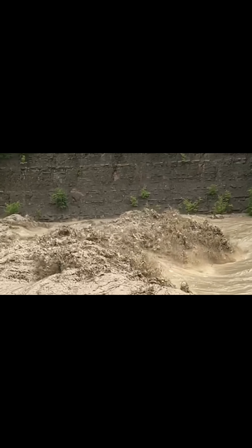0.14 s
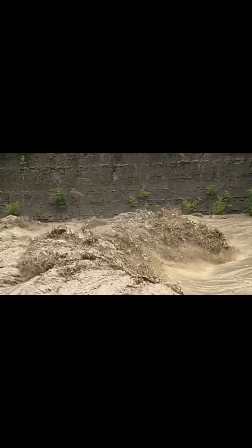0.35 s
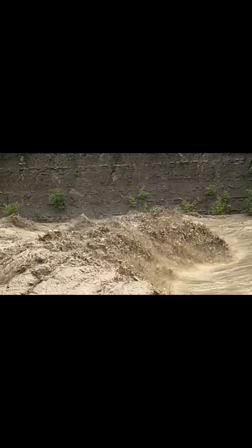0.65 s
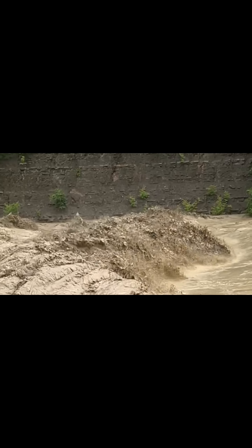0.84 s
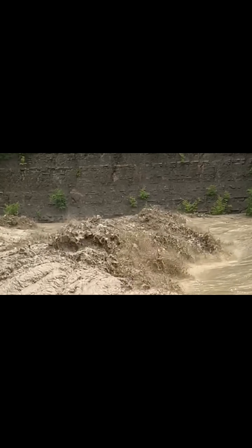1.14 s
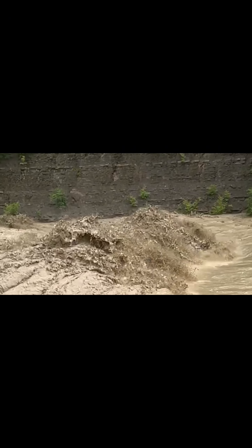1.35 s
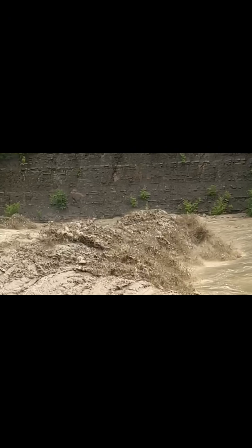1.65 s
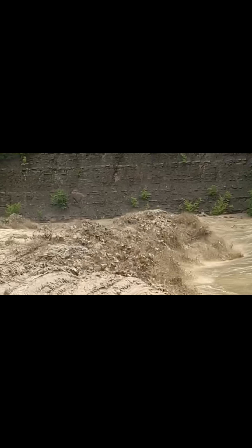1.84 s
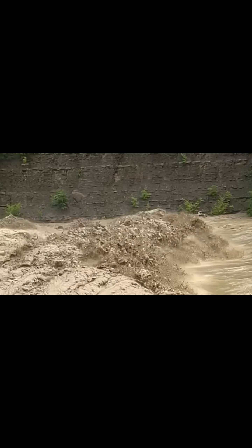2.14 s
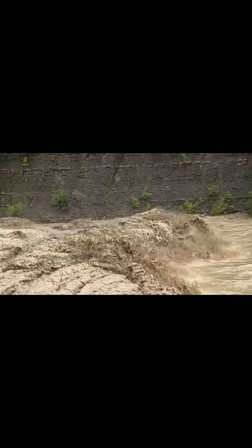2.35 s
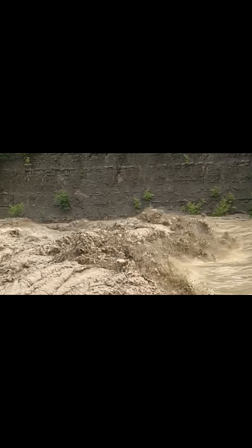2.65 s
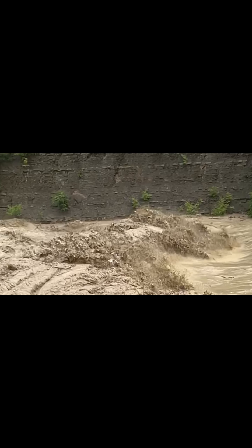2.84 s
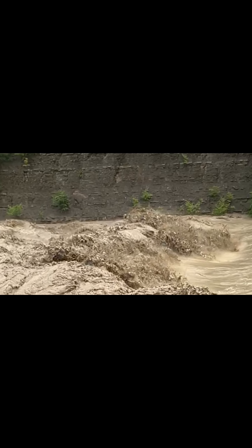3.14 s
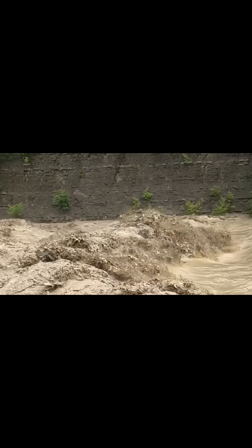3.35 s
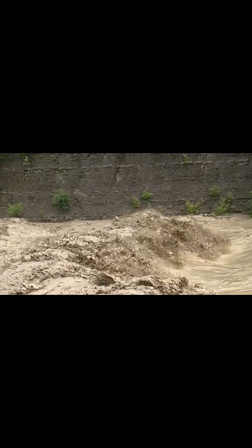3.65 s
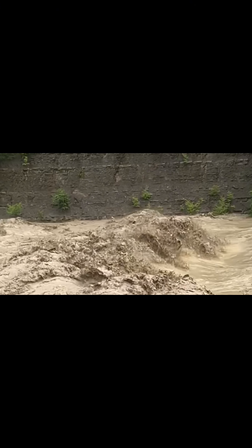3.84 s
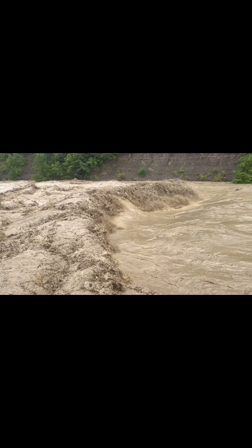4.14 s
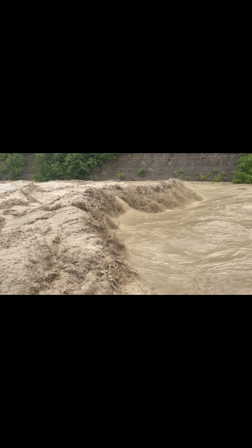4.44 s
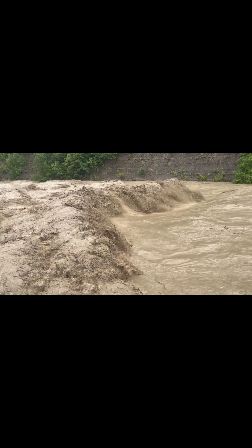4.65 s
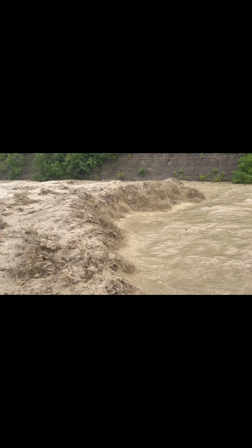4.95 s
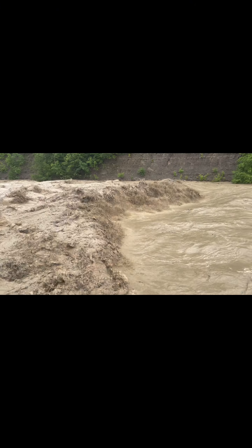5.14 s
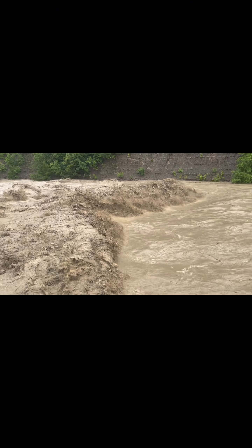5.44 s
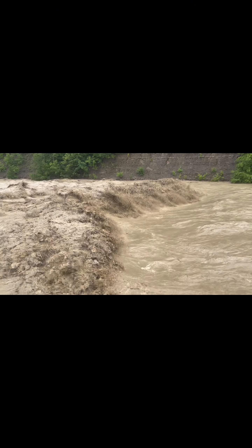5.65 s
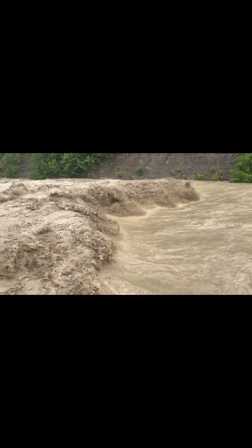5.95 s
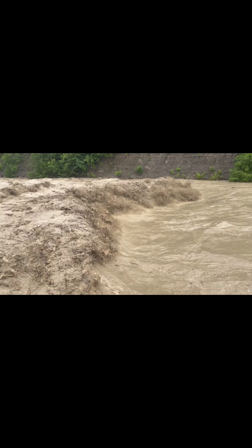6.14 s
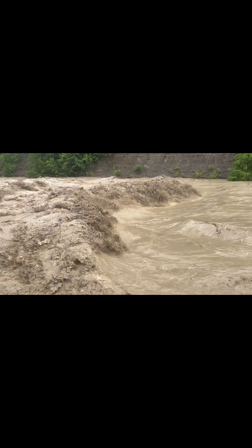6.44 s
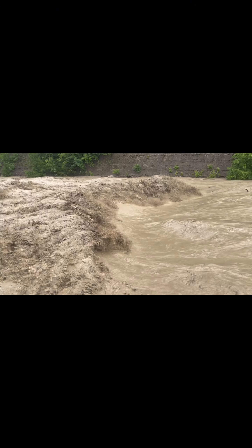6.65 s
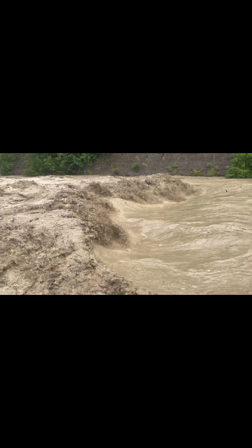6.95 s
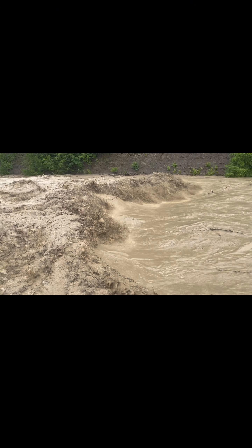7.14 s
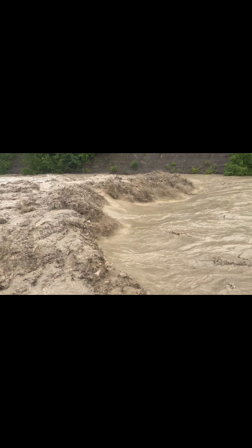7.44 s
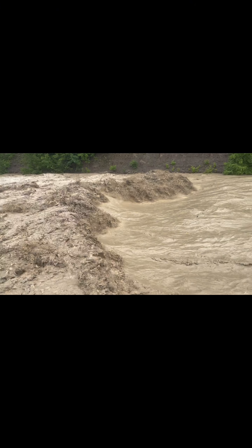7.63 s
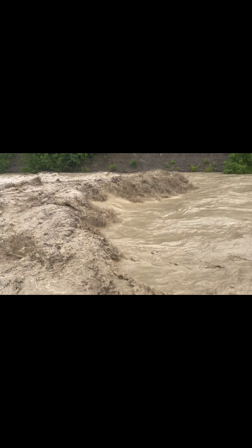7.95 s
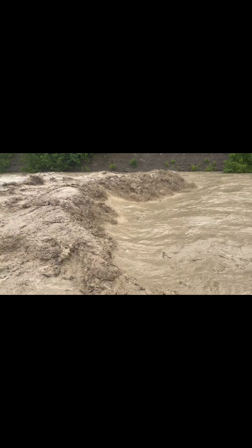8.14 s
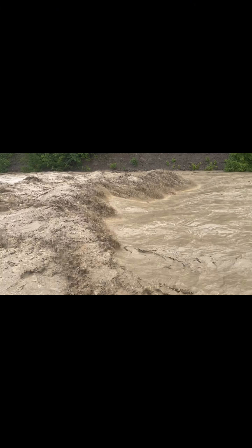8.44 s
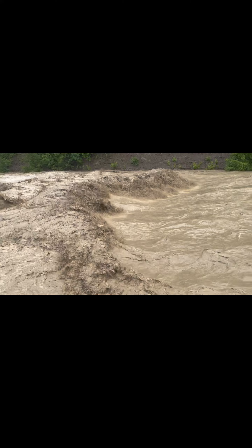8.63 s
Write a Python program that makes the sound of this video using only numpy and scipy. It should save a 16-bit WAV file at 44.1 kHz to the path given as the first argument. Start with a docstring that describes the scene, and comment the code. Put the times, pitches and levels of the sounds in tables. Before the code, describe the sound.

From 0 s, a swollen muddy river roars without pause, close and loud before a cliff wall. The sound is a deep, dull, wide rush with strong rumble, dense froth and small splashes, its highest treble cut off. Breaking waves make soft swells lasting about half a second to a second, and occasional low thumps of trapped air appear from about 1 s, with a stronger one near 3.4 s. The spray gradually brightens a little. At about 4.1 s the place changes abruptly to the open spillway: the level drops, dips briefly and recovers within half a second. The water is now quieter, airier and hissier, still with low rumble beneath. Plunging thuds cluster from 4.6 to 5 s and again around 6.7 to 7.2 s, then become sparse. Surges near 6.8 and 8.1 s pass, and the rush continues to the end around 9 s without fading.

```python
"""A river in flood pours over a bank of mud and debris, heard from two places in turn.
Before a cliff it roars, deep and dull; along the open spillway it hisses. Plunging waves thump.
The rush is patchy noise plus swarms of ringing bubbles; splashes spatter as short narrow-band bursts.
Breaking waves and sloshing move the levels of four bands: rumble, churn, rush, spray.
"""
import sys
import numpy as np
from scipy import signal
from scipy.fft import rfft, irfft
from scipy.io import wavfile
from scipy.ndimage import uniform_filter1d

SR = 44100
rng = np.random.default_rng(int(sys.argv[2]) if len(sys.argv) > 2 else 0)


def transcribe(signal):
    """Save signal, clipped to [-1, 1], as a 16-bit WAV file at the path in sys.argv[1]."""
    frames = np.atleast_2d(signal).T
    limited = np.clip(frames, -1, 1)
    pcm = np.round(limited * 32767).astype(np.int16)
    wavfile.write(sys.argv[1], SR, pcm)


N = 387638
T_S = np.arange(N) / SR
F_HZ = np.fft.rfftfreq(N, 1 / SR)


def gain_of(db):
    """Converts decibels to an amplitude factor."""
    return 10 ** (np.asarray(db) / 20)


def evened(x):
    """Scales to rms 1, over all channels together."""
    return x / np.sqrt(np.mean(x ** 2) + 1e-20)


def add(mix, start_s, sound):
    """Adds a sound into the mix in place, cut at the end."""
    part = mix[max(round(start_s * SR), 0):][:len(sound)]
    part += sound[:len(part)]


def low_pass(x, edge_hz):
    """Steep linear-phase band limit on both channels."""
    taps = signal.firwin(511, edge_hz, window=("kaiser", 9), fs=SR)
    return signal.oaconvolve(x, taps[None], "same")


def turbulence(patchy_db, flicker_db, smooth_hz):
    """Two independent noise streams with shared flare-ups, patchy in time and pitch."""
    hz, _, z = signal.stft(rng.standard_normal((2, N)), SR, nperseg=512, noverlap=384)
    patches = uniform_filter1d(rng.standard_normal(z.shape[1:]), size=10, axis=0)
    patches = evened(uniform_filter1d(patches, size=16, axis=1))
    flicker = evened(uniform_filter1d(rng.standard_normal(z.shape[2]), size=8))
    # fine spray has so many drops that it evens out
    lumpy = 1 / np.hypot(1, hz / smooth_hz)
    z *= gain_of(lumpy[:, None] * (patchy_db * patches + flicker_db * flicker))
    _, noise = signal.istft(z, SR, nperseg=512, noverlap=384)
    return evened(noise[:, :N])


def bubbles(per_s, spread_db, cycles, glide, count=48):
    """Bubbles of many sizes ring briefly, rising in pitch as they near the surface; per_s is per size."""
    out = np.zeros(N)
    for hz in np.geomspace(300, 12000, count):
        age = np.arange(0, 2, hz / (cycles * SR))  # unit: the time of `cycles` periods
        ring = np.exp(-np.pi * age) * np.sin(2 * np.pi * cycles * age * (1 + glide * age))
        chance = rng.random(N)
        size = np.minimum(rng.exponential(1, N), 4)
        births = (chance < per_s / SR) * gain_of(spread_db * size)
        out += hz * signal.oaconvolve(births, ring)[:N]  # equal power in every Hz
    return evened(out)


# trapped air pockets: start t/s, envelope peak level/dB, starting f/Hz
AIR_POCKETS = [(1.066, -13.5, 85), (1.662, -13.5, 173), (1.97, -11, 100), (2.408, -16, 169),
               (3.039, -16, 296), (3.19, -13.5, 174), (3.33, -15, 185), (3.446, -7.5, 95),
               (3.984, -14, 190), (4.03, -17, 253), (4.572, -7.5, 153), (4.615, -14, 245), (4.72, -12, 110),
               (4.771, -11, 198), (4.836, -13, 165), (4.884, -12.5, 167), (4.966, -5.5, 89),
               (5.462, -15, 200), (5.624, -7, 83), (5.982, -10, 140), (6.142, -8.5, 168),
               (6.348, -11.5, 76), (6.571, -12.5, 187), (6.685, -6, 100), (6.765, -11, 95), (6.790, -8, 88),
               (6.902, -14, 75), (6.954, -12, 130), (6.999, -8.5, 79), (7.067, -12, 80), (7.172, -13, 84),
               (7.605, -17, 90), (8.099, -12.5, 83)]


def plunges(swell_s, glide_per_s):
    """A wave folds over an air pocket, which throbs briefly with slightly rising pitch."""
    out = np.zeros(N)
    t = np.arange(SR // 10) / SR
    shape = (t / swell_s * np.exp(1 - t / swell_s)) ** 2
    for start_s, db, hz in AIR_POCKETS:
        throb = np.sin(2 * np.pi * hz * t * (1 + glide_per_s * t))
        add(out, start_s, -gain_of(db) * shape * throb)
    return out


SPLASH_LOW_HZ, SPLASH_HIGH_HZ = 1483, 5530
SPLASH_RISE_S, SPLASH_FALL_S = 0.0071, 0.039  # time constants


def splashes(width_hz, spread_db, count=220):
    """Water slaps back at random moments; each slap frees a burst of bubbles of about one size."""
    out = np.zeros((2, N))
    t = np.arange(SR // 5) / SR
    shape = (1 - np.exp(-t / SPLASH_RISE_S)) * np.exp(-t / SPLASH_FALL_S)
    noise_hz = abs(np.fft.fftfreq(len(t), 1 / SR))
    for k, (when, pitch, size) in enumerate(rng.random((count, 3))):
        hz = SPLASH_LOW_HZ * (SPLASH_HIGH_HZ / SPLASH_LOW_HZ) ** pitch
        band = np.exp(-.5 * ((noise_hz - hz) / width_hz) ** 2)
        noise = rng.standard_normal(len(t))
        fizz = evened(np.fft.ifft(np.fft.fft(noise) * band).real)
        add(out[k % 2], when * N / SR, gain_of(spread_db * size) * shape * fizz)
    return evened(out)


SPRAY_FALL_S = 0.063  # spray lags the other bands
# standing waves that collapse: hump centre t/s, length/s,
# level change/dB of rumble, churn, rush, spray
STANDING_WAVES = [(0.16, 0.98, 0.5, 2.1, 2, 1.3), (0.817, 0.3, 1.5, -0.5, 0.8, 0.5),
                  (1.6, 0.7, 2, 2.2, 1.1, -0.1), (2.54, 0.66, 1.5, 0, 0.8, 0.7),
                  (3.25, 0.78, 2, 2, 1, -0.2), (3.58, 0.23, 4, -1, 0.7, 1.5), (3.94, 0.6, 3, 1, 1.1, 0.7),
                  (4.85, 0.89, -0.5, 1, 0.1, 0), (5.417, 0.25, 2.5, 0.8, 1, 0.3),
                  (6.25, 0.5, 1, 0, 0.5, 0.2), (6.83, 0.41, 3.5, 2, 1.1, 1.4), (7.17, 0.5, 1, 0, 0.5, 0.9),
                  (7.7, 0.56, 2, 0.5, -0.3, -0.1), (8.15, 0.45, 3, 1, 1, 0.6),
                  (8.46, 0.66, -2.5, 0.5, 1.3, 0.7)]


def breakers():
    """Each collapse moves the band levels in one smooth hump, spray just behind: dB of four bands."""
    swells_db = np.zeros((4, N))
    for centre_s, length_s, rumble_db, churn_db, rush_db, spray_db in STANDING_WAVES:
        fold, splash = (np.cos(np.pi * np.clip((T_S - at_s) / length_s, -.5, .5)) ** 2
                        for at_s in (centre_s, centre_s + SPRAY_FALL_S))
        swells_db += [rumble_db * fold, churn_db * fold, rush_db * fold, spray_db * splash]
    return swells_db


SLOSH_HZ, SLOSH_WIDTH_HZ = 3.1, 1.4


def sloshing():
    """Uneven rocking of the water around one rate, rms 1."""
    band = np.exp(-.5 * ((F_HZ - SLOSH_HZ) / SLOSH_WIDTH_HZ) ** 2)
    return evened(irfft(rfft(rng.standard_normal(N)) * band, N))


SLOSH_DB = (0.2, 0.3, 0.16, 0.26)  # rms, for rumble, churn, rush, spray


def current(flow_db, drift_db_per_s, mid_s):
    """Flow at one place drifts linearly and sloshes, each band on its own: dB of four bands."""
    return np.array([db + drift * (T_S - mid_s) + slosh_db * sloshing()
                     for db, drift, slosh_db in zip(flow_db, drift_db_per_s, SLOSH_DB)])


def surging(water, flow_db, edges_hz):
    """Splits the water into rumble, churn, rush and spray, and sets their moving levels."""
    spectrum = rfft(water)
    below = [1 / (1 + (F_HZ / edge) ** 4) for edge in edges_hz]
    bands = np.diff([0 * F_HZ, *below, 0 * F_HZ + 1], axis=0)
    return sum(gain_of(db) * irfft(spectrum * band, N) for db, band in zip(flow_db, bands))


def read(table):
    """Interpolates every column over log frequency."""
    points_hz, *columns = np.transpose(table)
    return [np.interp(np.log(F_HZ + 1), np.log(points_hz + 1), column) for column in columns]


def heard(water, colour, image, delay_s):
    """Shapes spectrum, balance, likeness and phase of the two channels for one place, rms 1."""
    db, balance_db = read(colour)
    likeness, phase_lag = read(image)
    direct, scattered = rfft(water)
    left = direct * gain_of(balance_db / 2)
    # right channel: part the same sound, part from other stretches of the river
    right = likeness * direct + np.sqrt(1 - likeness ** 2) * scattered
    right *= gain_of(-balance_db / 2)
    right *= np.exp(-1j * (2 * np.pi * F_HZ * delay_s + phase_lag))
    low_cut = np.minimum(F_HZ / colour[0][0], 1)
    return evened(irfft(np.array([left, right]) * gain_of(db) * low_cut, N))


CLIFF_DB, CLIFF_EDGE_HZ = -14.5, 9100
CLIFF_DELAY_S = .00052  # right channel; the phase column adds to it
# rumble, churn, rush, spray: level at CLIFF_MID_S, and drift
CLIFF_FLOW_DB, CLIFF_DRIFT_DB_PER_S = (0.2, 0.4, -0.6, -0.43), (-0.13, 0.22, 0.4, 0.54)
CLIFF_MID_S = 2.1
# water's spectrum at the cliff: f/Hz, relative level/dB, left minus right/dB
CLIFF_SPECTRUM = [(12, -63.0, 0.1), (22, -44.0, 0.8), (40, -38.8, -0.7), (135, -44.1, 1.3),
                  (195, -43.2, -1.4), (255, -42.4, -4.7), (320, -45.3, -4.1), (370, -45.9, -4.2),
                  (490, -47.0, -2.5), (670, -52.3, -4.8), (830, -51.2, 0.7), (970, -54.6, 3.2),
                  (1170, -53.0, -0.2), (1520, -57.0, -4.7), (1760, -56.4, -2.2), (1950, -58.8, -4.2),
                  (2330, -60.7, -7.0), (2650, -60.3, -0.5), (3500, -65.2, -0.2), (4200, -65.0, -0.1),
                  (4800, -66.1, -0.1), (7400, -72.0, 0), (8400, -74.0, 0.1), (9100, -80.0, -0.1)]
# stereo image by frequency: f/Hz, left-right likeness/0-1, right-channel phase lag/rad
CLIFF_STEREO = [(40, 0.998, -0.25), (95, 0.985, -0.5), (130, 0.89, -1.0), (165, 0.87, -1.95),
                (200, 0.88, -2.65), (310, 0.8, -3.0), (420, 0.8, -3.82), (520, 0.58, -4.96),
                (650, 0.43, -6.85), (830, 0.79, -7.68), (1000, 0.68, -8.31), (1400, 0.22, -8.4),
                (1600, 0.38, -8.37), (1760, 0.58, -9.1), (2130, 0.25, -10.4), (2350, 0.62, -12.15),
                (2700, 0.9, -12.24), (3000, 0.9, -12.4), (3500, 0.83, -12.31), (4400, 0.87, -12.5),
                (4850, 1.0, -12.66), (5800, 0.87, -12.89), (7000, 1.0, -13.5), (7600, 0.78, -13.58),
                (8400, 0.8, -14.1), (9100, 0.97, -13.87)]


def before_cliff(water, swells_db):
    """The water's deep, dull roar before the cliff, its treble cut off."""
    flow_db = swells_db + current(CLIFF_FLOW_DB, CLIFF_DRIFT_DB_PER_S, CLIFF_MID_S)
    flow = surging(water, flow_db, edges_hz=(140, 420, 2300))
    roar = heard(flow, CLIFF_SPECTRUM, CLIFF_STEREO, CLIFF_DELAY_S)
    return gain_of(CLIFF_DB) * low_pass(roar, CLIFF_EDGE_HZ)


MOVE_S, MOVE_LENGTH_S = 4.13, 0.048  # midpoint and length of the change of place
SPILLWAY_DB = -18.5
# rumble, churn, rush, spray: level at SPILLWAY_MID_S, and drift
SPILLWAY_FLOW_DB = (-0.067, -0.43, -0.44, -0.92)
SPILLWAY_DRIFT_DB_PER_S = (-0.43, -0.55, 0.37, 0.096)
SPILLWAY_MID_S = 6.5
# brief dip on arrival: depth of rumble, churn, rush, spray, and time constant
DIP_DB, DIP_RECOVERY_S = (7.2, 3, 1.5, 3.0), 0.14
# water's spectrum at the spillway: f/Hz, relative level/dB, left minus right/dB
SPILLWAY_SPECTRUM = [(22, -73, 0.4), (50, -42.3, 0.2), (90, -40.6, 0.0), (170, -44.8, 0.1),
                     (270, -46.6, -1.2), (330, -49.4, -1.6), (460, -53.2, -0.5), (540, -52.8, 0.3),
                     (650, -53.6, -2.5), (850, -53.0, -1.3), (1060, -56.1, 1.2), (1530, -54.8, -2.6),
                     (1720, -60.2, 3.3), (2020, -60.4, 0.5), (2450, -64.1, 1.8), (3400, -63.9, 1.6),
                     (4700, -66.5, 2.2), (5400, -68.7, 3.9), (6500, -68.7, 2.3), (7500, -69.6, 0.6),
                     (10500, -70.5, -0.1), (13000, -73.9, 0.1), (15600, -75.9, -0.1)]
# stereo image by frequency: f/Hz, left-right likeness/0-1, right-channel phase lag/rad
SPILLWAY_STEREO = [(60, 0.93, 0.07), (130, 0.89, 0.06), (250, 0.93, 0.07), (330, 0.9, 0.1),
                   (470, 0.72, 0.15), (650, 0.66, 0.11), (850, 0.7, 0.72), (1060, 0.42, 0.78),
                   (1300, 0.17, -0.46), (1550, 0.04, 1.2), (1720, 0.55, 0.53), (2020, 0.76, 0.18),
                   (2450, 0.67, 0.65), (3000, 0.53, 0.93), (3500, 0.47, 0.55), (4200, 0.45, 0.58),
                   (4900, 0.56, 0.84), (5500, 0.42, -0.74), (6500, 0.63, -0.99), (7400, 0.68, -2.3),
                   (7850, 1.0, -3.1), (8800, 1.0, -3.18), (9300, 0.6, -3.8), (10000, 0.62, -5.27),
                   (11100, 0.8, -6.1), (13400, 0.8, -6.45), (14300, 0.4, -7.9), (14700, 1.0, -9.42)]


def beside_spillway(water, swells_db):
    """The water's hiss along the open spillway, recovering from a dip on arrival."""
    flow_db = swells_db + current(SPILLWAY_FLOW_DB, SPILLWAY_DRIFT_DB_PER_S, SPILLWAY_MID_S)
    since_move_s = np.maximum(T_S - MOVE_S, 0)
    flow_db -= np.outer(DIP_DB, np.exp(-since_move_s / DIP_RECOVERY_S))
    flow = surging(water, flow_db, edges_hz=(135, 350, 2380))
    return gain_of(SPILLWAY_DB) * heard(flow, SPILLWAY_SPECTRUM, SPILLWAY_STEREO, delay_s=0)


def scene():
    """The same frothing, splashing water before the cliff, then beside the spillway, plus plunges."""
    froth = np.array([bubbles(per_s=90, spread_db=2.5, cycles=14.8, glide=0.022) for channel in range(2)])
    water = turbulence(patchy_db=1.0, flicker_db=0.06, smooth_hz=3500)
    water += gain_of(-9.0) * froth
    water += gain_of(-17) * splashes(width_hz=87, spread_db=7)
    swells_db = breakers()
    cliff = before_cliff(water, swells_db)
    spillway = beside_spillway(water, swells_db)
    moved = np.clip((T_S - MOVE_S) / MOVE_LENGTH_S + .5, 0, 1)
    river = np.sqrt(1 - moved) * cliff + np.sqrt(moved) * spillway  # equal-power crossfade
    return river + plunges(swell_s=0.0075, glide_per_s=0.37)


def record(dry):
    """Band limit of the whole sound."""
    return low_pass(dry, edge_hz=15700)


dry = scene()
out = record(dry)
transcribe(out)
```